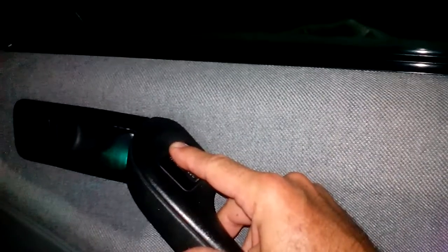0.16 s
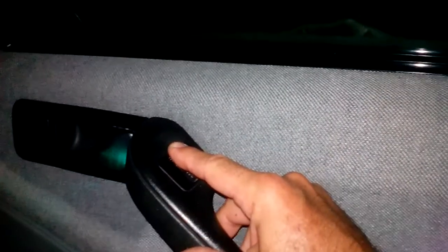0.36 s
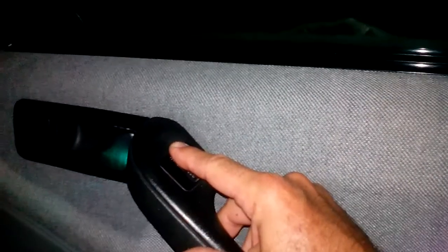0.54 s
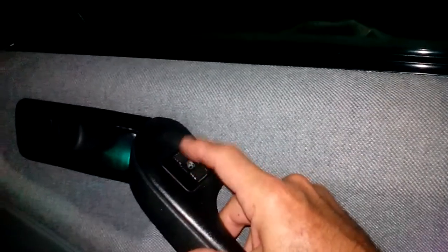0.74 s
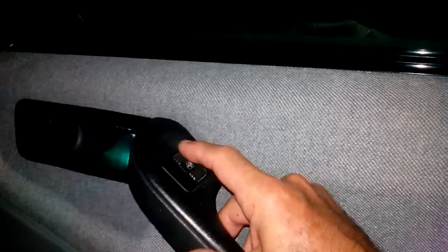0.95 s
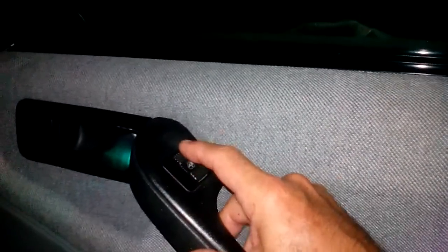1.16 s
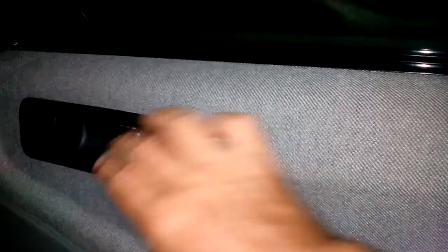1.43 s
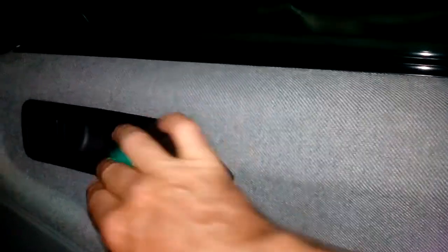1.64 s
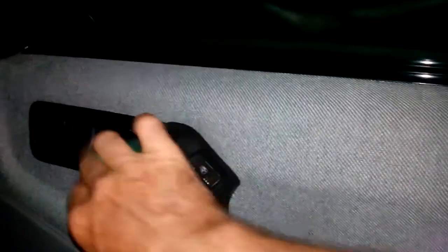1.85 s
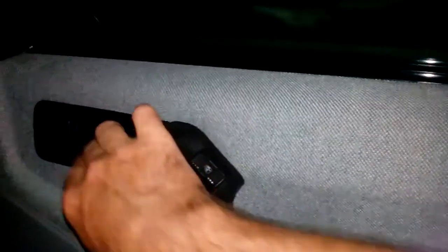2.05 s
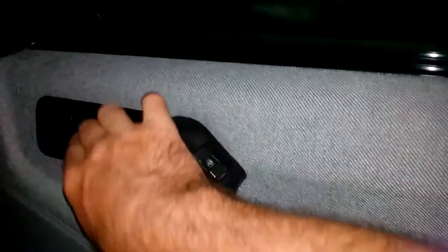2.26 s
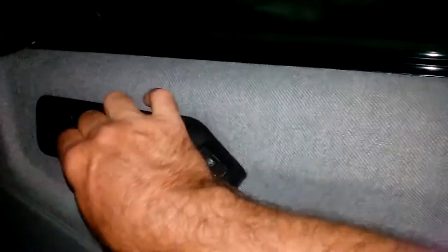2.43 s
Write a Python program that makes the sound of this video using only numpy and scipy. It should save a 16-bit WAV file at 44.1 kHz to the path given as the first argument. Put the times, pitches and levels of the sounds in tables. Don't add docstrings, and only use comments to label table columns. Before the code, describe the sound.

A power window motor whirs in a small, dry car cabin, labouring from 0.2 s as the rubber seal moans. At 0.5 s the glass stops with a deep, rattling clunk; the door shudders and settles with small knocks until 0.9 s. Near quiet follows, with faint switch clicks around 1.35 s, sleeve rustle, a soft hand thump at 2.15 s, and plastic creaks near 2.55 s. Close microphone.

```python
import sys
import numpy as np
from scipy import signal
from scipy.io import wavfile

SR = 44100
rng = np.random.default_rng(int(sys.argv[2]) if len(sys.argv) > 2 else 0)


def generate_wav(signal):
    frames = np.transpose(np.atleast_2d(signal))
    scaled = np.clip(frames, -1, 1) * 32767
    pcm = np.round(scaled).astype(np.int16)
    wavfile.write(sys.argv[1], SR, pcm)


def attenuation_scalar(level_db):
    decades = np.asarray(level_db, float) / 20
    return 10 ** decades


N = 114660
T = np.arange(N) / SR
RISE_S = .004


def rms_one(x):
    return x / np.sqrt(np.mean(x ** 2) + 1e-20)


def white():
    return rng.standard_normal(N)


def in_time(rows):
    s, *columns = np.transpose(rows)
    return [np.interp(T, s, c) for c in columns]


def active(rows):
    return (T > rows[0][0]) * (T < rows[-1][0])


def phase_of(hz):
    return 2 * np.pi * np.cumsum(hz) / SR


def glide(rows):
    hz, db = in_time(rows)
    return attenuation_scalar(db) * np.sqrt(2) * np.sin(phase_of(hz)) * active(rows)


def drift(rate_hz):
    r = np.exp(-80 * np.pi * rate_hz / SR)
    slow = signal.lfilter([1], [1, -2 * r, r * r], rng.standard_normal(N // 40 + 2002))[2000:]
    return np.interp(np.arange(N) / 40, np.arange(len(slow)), rms_one(slow))


def cut(x, hz, kind, order=2):
    sos = signal.butter(order, np.clip(hz, 10, .45 * SR), kind, fs=SR, output="sos")
    return signal.sosfilt(sos, x)


def resonate(x, peaks):
    out = 0
    for k, (hz, width_hz, db) in enumerate(peaks):
        r = np.exp(-np.pi * width_hz / SR)
        poles = [1, -2 * r * np.cos(2 * np.pi * hz / SR), r * r]
        ring = signal.lfilter([(1 - r * r) / 2, 0, (r * r - 1) / 2], poles, x)
        out = out + (-1) ** k * attenuation_scalar(db) * ring
    return out


def wandering(x, peaks, shift_db, rate_hz):
    out = 0
    for k, peak in enumerate(peaks):
        out = out + (-1) ** k * attenuation_scalar(shift_db * drift(rate_hz)) * resonate(x, [peak])
    return out


def coloured(spectrum, patchy_db):
    out, edges_hz = 0, 22 * 2 ** np.arange(0, 9.6, .5)
    sources = rng.standard_normal((2, N))
    hz, db = np.transpose(spectrum)
    for k, (low, high) in enumerate(zip(edges_hz, edges_hz[1:])):
        level_db = np.interp(np.log(low * high) / 2, np.log(hz), db, left=-90)
        band = cut(sources[k % 2], [low, high], "band")
        out = out + attenuation_scalar(level_db + patchy_db * drift(12)) * band
    return rms_one(out)


def after(start_s, db_per_s):
    since = T - start_s
    return np.clip(since / RISE_S, 0, 1) * attenuation_scalar(-db_per_s * np.maximum(since, 0))


# t/s, commutator f/Hz, whine level/dB, hiss level/dB
MOTOR_RUN = [(0, 638, -67.5, -91), (.04, 637, -61, -61.5), (.205, 634, -56.5, -56.5),
             (.228, 616.6, -45, -47), (.29, 601, -44, -48.5), (.31, 619, -48, -43.5),
             (.325, 602.5, -46, -41), (.355, 579.5, -42, -43.5), (.39, 594, -41, -41.5),
             (.405, 585, -48.5, -45.5), (.42, 596.3, -44, -45.5), (.5, 602, -46.5, -45),
             (.522, 600, -45, -41), (.528, 606, -92, -59), (.625, 594, -103, -62.5)]
# f/Hz, density/dB per Hz
BRUSH_HISS = [(300, -35), (460, 3), (700, -2), (848, -31.5), (1020, 2), (1260, -12.5), (2140, -6),
              (2490, -9), (5450, -13.5), (15000, -75)]
# f/Hz, width/Hz, level/dB
HOUSING_PEAKS = [(989, 31, 6.5), (1360, 38, 10), (1730, 94, 2.5), (2092, 50, 11.5), (2760, 70, 6.5),
                 (3354, 70, 7.5), (3830, 120, -4), (4360, 83, 5.5), (5467, 220, 1.5), (6630, 520, 11)]
# f/Hz, width/Hz, level/dB
GEAR_PEAKS = [(454.5, 83, 12.5)]


def motor():
    hz, whine_db, hiss_db = in_time(MOTOR_RUN)
    phase = phase_of(hz * (1 + .003 * drift(25)))
    load_db = np.maximum(whine_db - MOTOR_RUN[1][2], 0)
    fourth = attenuation_scalar(-17.5 + 1.8 * drift(17)) * np.sin(4 * phase)
    octave_gain = attenuation_scalar(6.5 - 1.3 * load_db)
    whine = np.sin(phase) * attenuation_scalar(1.5 * drift(37)) + octave_gain * (np.sin(2 * phase) + fourth)

    noise = coloured(BRUSH_HISS, patchy_db=1.7)
    hiss = rms_one(noise + wandering(noise, HOUSING_PEAKS, shift_db=4, rate_hz=7.5))
    hiss = cut(hiss, 7600, "low") * attenuation_scalar(.5 * drift(60))

    rumble = rms_one(cut(cut(white(), 218, "low"), 30, "high"))
    rumble = rumble + resonate(white(), GEAR_PEAKS)
    rumble_db = -59.5 + .81 * (hiss_db + 68.5)

    stop = np.clip((MOTOR_RUN[-1][0] - T) / RISE_S, 0, 1)
    return stop * (np.sqrt(2) * attenuation_scalar(whine_db) * whine + attenuation_scalar(hiss_db) * hiss + attenuation_scalar(rumble_db) * rumble)


# t/s, level/dB
AIR_LEVEL = [
    (0, -56),
    (1.05, -71.5),
    (1.15, -65.5),
    (1.3, -65.5),
    (1.5, -71),
    (1.66, -68),
    (1.85, -63.5),
    (2.1, -65),
    (2.3, -68.5),
    (2.6, -63.5),
]
# f/Hz, density/dB per Hz
AIR_SPECTRUM = [(15, -37), (25, -11.5), (136, -1), (536, -11), (597, -12), (1700, -18), (5860, -21.5),
                (8090, -36), (15400, -50)]


def cabin_air():
    return attenuation_scalar(in_time(AIR_LEVEL)[0]) * coloured(AIR_SPECTRUM, patchy_db=1.5)


# f/blow pitch, level/dB, cycles to -60 dB
PANEL_MODES = [(.63, -8.5, 10.5), (1, 2, 10.5), (1.84, -3.5, 16), (2.25, -20.5, 4.5), (3.06, -15, 15.5),
               (4.5, -23.5, 57), (5.7, -28.5, 47)]
# t/s, level/dB, pitch f/Hz, overtones level/dB, ring-length factor
BLOWS = [(0.185, -29, 91.7, 15.5, 1.8), (0.202, -8.5, 116, -3.5, 0.85), (0.297, -15, 128.5, -7, 1.8),
         (0.515, -2.5, 103.2, 3.5, 0.75), (0.525, -11.5, 106.7, 6.5, 0.55),
         (0.5388, -13.5, 141.7, -35, 1.3), (0.577, -24, 105, -17, 0.93), (0.692, -28, 130.3, -5, 1.85),
         (0.707, -28, 131.5, 7, 1.87), (0.767, -40.5, 114, -15, 3.8), (0.938, -47.5, 92.2, -7, 0.75),
         (1.343, -52, 203, -16, 1), (1.366, -40.5, 239, -8, 1.07), (1.389, -45.5, 200, -8, 2),
         (1.373, -52, 78.4, -2.5, 2), (.64, -38, 56.2, -10, 1.7), (1.846, -54.5, 105, -13, 0.25),
         (2.063, -41.5, 285, 4, 2.3), (2.147, -37, 71, -16, 0.78), (2.161, -29.5, 152.4, 5.5, 0.37),
         (2.399, -50, 117, -17.5, 2.8), (2.569, -39, 126, -6, 2.4)]


def thuds():
    out, t = np.zeros(N + SR), np.arange(SR // 2) / SR
    rise = np.sin(np.pi / 2 * np.minimum(t * 1000 / 4.5, 1)) ** 2
    for s, db, pitch_hz, overtones_db, ring_share in BLOWS:
        rings = 0
        for k, (multiple, mode_db, cycles) in enumerate(PANEL_MODES):
            hz = pitch_hz * multiple
            ring_db = mode_db + overtones_db * (k > 1) - 60 * t * hz / (cycles * ring_share)
            rings = rings + (-1) ** k * attenuation_scalar(ring_db) * np.cos(2 * np.pi * hz * t)
        blow = cut(rings * rise, 20, "high")
        out[int(s * SR):int(s * SR) + len(t)] += attenuation_scalar(db) * blow / np.abs(blow).max()
    return out[:N]


# t/s, f/Hz, level/dB
SEAL_MOAN = [
    (.2, 362.6, -58),
    (.222, 356, -24.5),
    (.25, 352.3, -56),
    (.278, 375, -33),
    (.32, 345, -22.5),
    (.35, 337, -26),
    (.375, 336.8, -23),
    (.41, 352, -30.5),
    (.47, 368, -53),
]
# multiple, level/dB
MOAN_PARTIALS = [(2, -28), (3, -28.5)]


def seal():
    hz, db = in_time(SEAL_MOAN)
    phase = phase_of(hz * (1 + .005 * drift(40)))
    tone = np.sin(phase) * attenuation_scalar(2 * drift(27.8))
    for multiple, partial_db in MOAN_PARTIALS:
        level_db = partial_db + .8 * (db + 24) + 4 * drift(20)
        tone = tone + attenuation_scalar(level_db) * np.sin(round(multiple) * phase)
    return np.sqrt(2) * attenuation_scalar(db) * tone * active(SEAL_MOAN)


# t/s, level/dB, centre f/Hz, broad crack level/dB, t60/ms
CLICK_EVENTS = [(0.202, -43.5, 720, -31.5, 21), (0.4803, -36.5, 890, 2.5, 55), (0.514, -40, 1185, -9, 60),
                (.595, -55, 3450, 0.5, 44), (.702, -52.5, 884, -8, 90), (0.789, -61, 1970, -14, 56),
                (.731, -70, 2800, -1, 31), (.834, -68, 2490, 2, 30), (0.8435, -56, 1090, 6, 43),
                (.853, -63, 694, -7, 85), (0.929, -61, 1870, -17, 58), (1.326, -59, 1160, -7, 110),
                (1.357, -57.5, 610, -9, 100), (1.412, -71.5, 2550, 5, 110), (2.061, -48, 880, -22, 113),
                (2.144, -55.5, 1610, -23, 56), (2.154, -45.5, 2180, -6, 81), (2.162, -47.5, 690, -2.5, 72),
                (2.171, -80, 4340, 0, 100), (2.19, -75.5, 4650, 15.5, 102), (2.385, -55, 782, -10, 95),
                (2.505, -59.5, 1080, -12.5, 180), (2.533, -61, 1500, -22, 410), (2.542, -54, 980, -1, 430),
                (2.551, -46.5, 2840, -3, 65), (2.563, -49, 1000, -14, 67)]
# f/Hz, level/dB
TRIM_MODES = [(480, 9), (700, 8.5), (920, 8.5), (1200, 2), (1480, 0), (1760, -1), (2300, -7.5), (2760, -6),
              (3400, -20.5), (4500, -13), (5600, -0.5)]


def clicks():
    out, t = np.zeros(N + SR), np.arange(SR // 4) / SR
    size = (len(CLICK_EVENTS), len(t))
    grit = rng.standard_normal(size) * attenuation_scalar(1.4 * rng.exponential(1, size))
    offsets_db = rng.normal(0, 1.5, (len(CLICK_EVENTS), len(TRIM_MODES)))
    wide = 2 ** .8
    for (s, db, hz, crack_db, t60_ms), noise, own_db in zip(CLICK_EVENTS, grit, offsets_db):
        decay = attenuation_scalar(-60000 * t / t60_ms) + 1.3 * np.exp(-t / .0012)
        burst = noise * np.minimum(t * 1000 / .8, 1) * decay

        modes = [(f, f / 24 + 30, g + o) for (f, g), o in zip(TRIM_MODES, own_db)]
        body = cut(burst, [hz / wide, hz * wide], "band")
        body = body + attenuation_scalar(11) * resonate(body, modes + [(hz, hz / 7, 2)])

        crack = cut(burst, [400, 3500], "band", order=1)
        crack = cut(crack, 6500, "low", order=4) + attenuation_scalar(-24) * crack

        click = 0
        for gain, x in ((1, body), (attenuation_scalar(crack_db), crack)):
            click = click + gain * x / np.sqrt(np.mean(x[:SR // 100] ** 2))
        out[int(s * SR):int(s * SR) + len(t)] += attenuation_scalar(db) * click
    return out[:N]


# t/s, length/s, f/Hz, level/dB
SQUEAL_EVENTS = [(.22, .05, 2760, -52), (.325, 0.06, 2790, -51.5), (.37, .035, 1994, -47),
                 (.372, 0.031, 1017, -37), (.41, .03, 1760, -49), (.448, .022, 1640, -44),
                 (.48, 0.0071, 10780, -62.5), (.48, 0.006, 12800, -60), (.4795, .01, 1035, -31.5),
                 (.484, .025, 502, -32.5), (.595, 0.021, 5800, -65), (.6, .03, 3280, -68),
                 (.788, 0.011, 2680, -63), (.843, 0.032, 1535, -62.5), (.845, .012, 3300, -60),
                 (.862, 0.028, 2750, -70), (.862, .025, 1870, -69), (.928, 0.0085, 1810, -57),
                 (2.061, 0.037, 479, -52), (2.061, 0.048, 867, -69), (2.153, 0.02, 1820, -43),
                 (2.153, 0.014, 2228, -42), (2.155, 0.027, 1254, -52.5), (2.385, 0.022, 341, -64),
                 (2.541, 0.036, 914, -45.5), (2.543, .008, 5030, -61), (2.55, 0.03, 2760, -48.5),
                 (2.552, 0.013, 2420, -43), (2.55, 0.017, 1640, -44.5), (2.561, 0.017, 1804, -44),
                 (2.578, 0.013, 2510, -55.5), (2.56, 0.019, 1203, -50)]
# t/s, f/Hz, level/dB
WHISTLE_ARCH = [
    (.78, 9700, -100),
    (.81, 10300, -98),
    (.845, 10460, -89),
    (.875, 10400, -100),
    (.92, 9900, -100),
]


def squeals():
    out, wobble, flutter_db = np.zeros(N), .008 * drift(150), 2.5 * drift(120)
    for k, (s, length_s, hz, db) in enumerate(SQUEAL_EVENTS):
        now = np.flatnonzero((T > s) & (T < s + length_s))
        own = (now + 997 * k) % N
        shape = np.sin(np.pi * np.sqrt((T[now] - s) / length_s))
        tone = np.sin(phase_of(hz * (1 + wobble[own])))
        out[now] += attenuation_scalar(db + flutter_db[own]) * np.sqrt(2) * shape * tone
    return out + glide(WHISTLE_ARCH)


# t/s, level/dB, decay/dB per s
RATTLE_BURSTS = [
    (0.516, -27, 172),
    (0.574, -32.5, 302),
    (0.695, -37, 200),
    (1.329, -59.5, 116),
    (2.164, -50, 144),
]
# f/Hz, level/dB
LOOSE_PARTS = [(300, 6.5), (400, 5), (490, -3), (600, -3.5), (780, -7), (950, -6.5), (1250, -10.5),
               (1500, -17.5), (1900, -20.5)]


def rattle():
    contacts = rms_one(white() * attenuation_scalar(1.5 * rng.exponential(1, N)))
    force = sum(attenuation_scalar(db) * after(s, db_per_s) for s, db, db_per_s in RATTLE_BURSTS)
    peaks = [(hz, 40 + hz / 12, db) for hz, db in LOOSE_PARTS]
    ringing = wandering(contacts * force, peaks, shift_db=3, rate_hz=10.5)
    return 3 * cut(ringing, 1900, "low", order=4)


def shudder():
    low = rms_one(cut(cut(white(), 200, "low", order=4), 75, "high")) * attenuation_scalar(1.7 * drift(15))
    low = low + attenuation_scalar(1) * rms_one(cut(white(), [25, 56.5], "band"))
    shake = attenuation_scalar(-29.5) * after(.52, db_per_s=84) * low

    sway_s, sway_hz, sway_t60_s = 2.175, 36, .52
    sway = attenuation_scalar(2 * drift(21)) * np.sin(2 * np.pi * sway_hz * (T - sway_s))
    sway = sway + .36 * rms_one(cut(white(), [45, 130], "band"))
    onset = np.clip((T - sway_s) / .0049, 0, 1)
    return shake + attenuation_scalar(-30) * after(sway_s, 60 / sway_t60_s) * onset * sway


# t/s, f/Hz, level/dB
REBOUND_GLIDE = [
    (.595, 105, -66),
    (.615, 103, -25),
    (.635, 129, -24),
    (.648, 165, -29),
    (.668, 160, -64),
]


def rebound():
    return glide(REBOUND_GLIDE)


def scene():
    door = thuds() + rattle() + shudder() + rebound()
    mix = motor() + cabin_air() + seal() + clicks() + squeals() + door
    return mix[None]


def top_cut(x):
    return signal.sosfilt(signal.butter(12, 15580, fs=SR, output="sos"), x)


def record(dry):
    top = .85
    hiss = attenuation_scalar(-89) * cut(white(), 8000, "high")
    return top_cut(top * np.tanh(dry / top) + hiss)


dry = scene()
out = record(dry)
generate_wav(out)
```